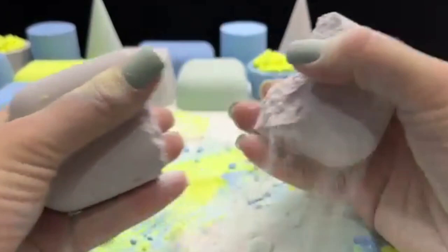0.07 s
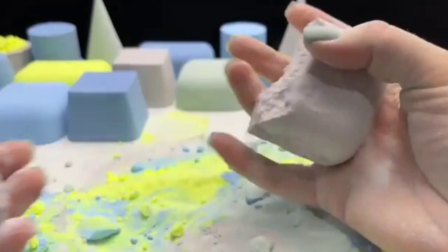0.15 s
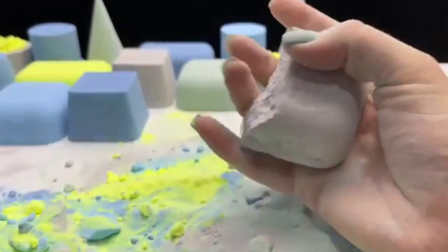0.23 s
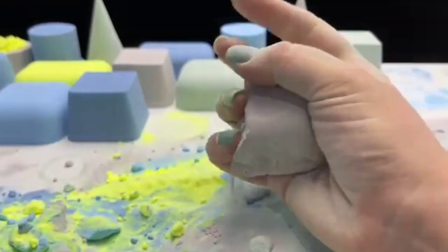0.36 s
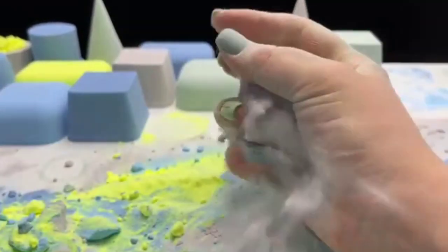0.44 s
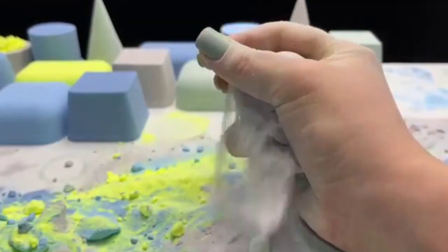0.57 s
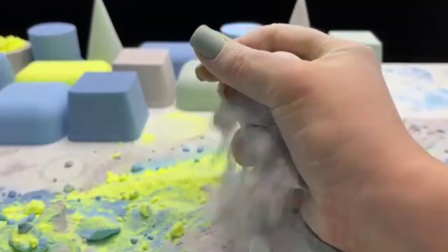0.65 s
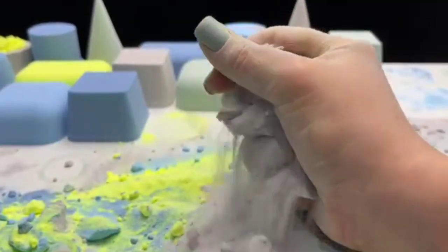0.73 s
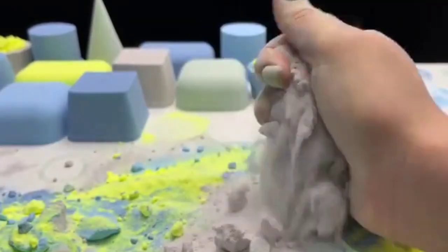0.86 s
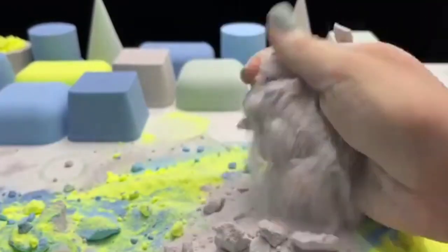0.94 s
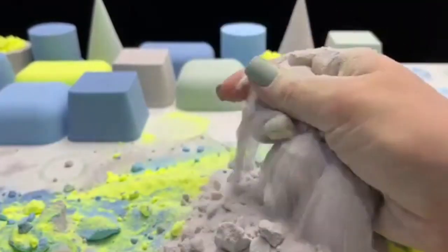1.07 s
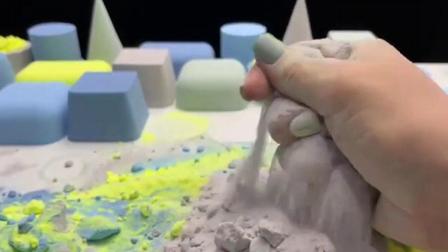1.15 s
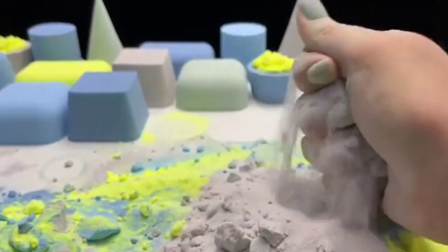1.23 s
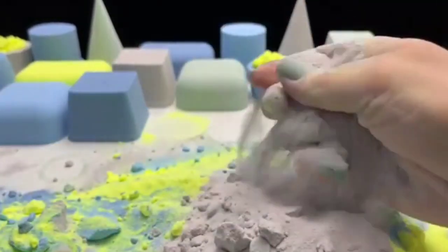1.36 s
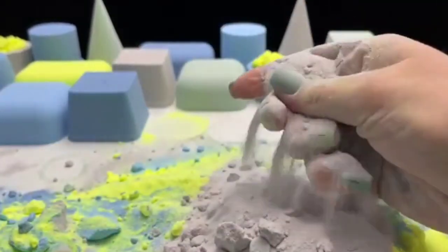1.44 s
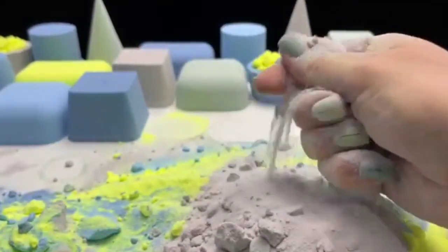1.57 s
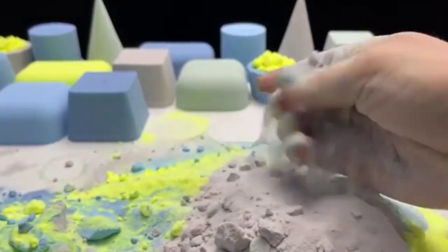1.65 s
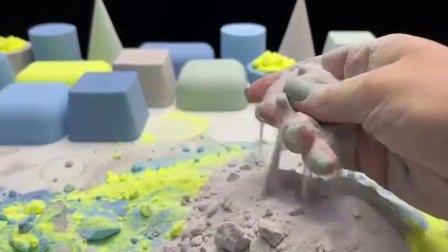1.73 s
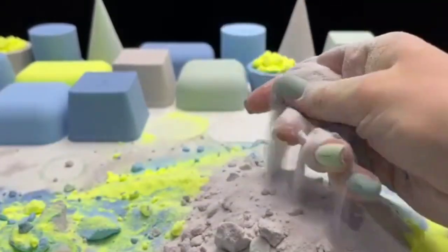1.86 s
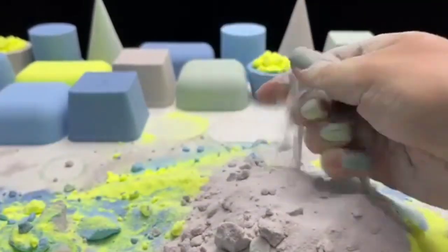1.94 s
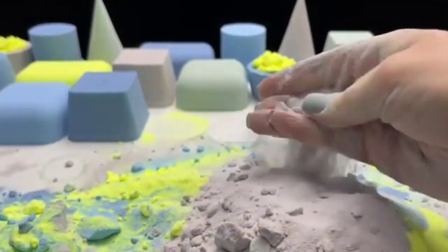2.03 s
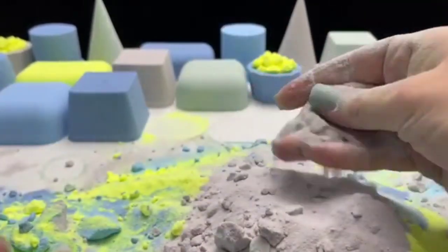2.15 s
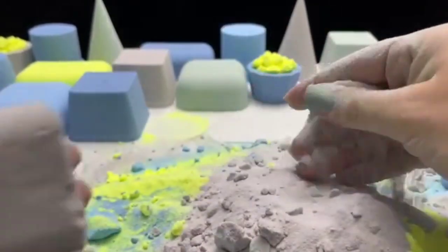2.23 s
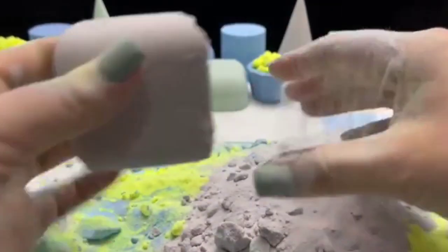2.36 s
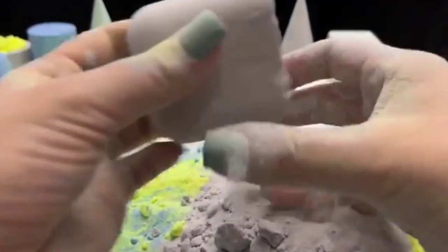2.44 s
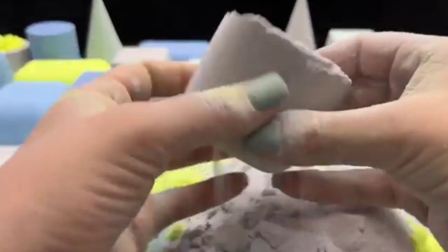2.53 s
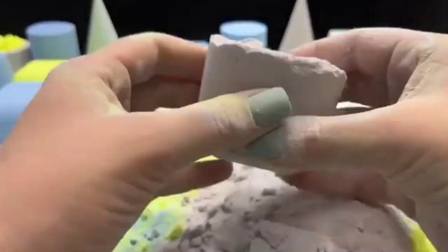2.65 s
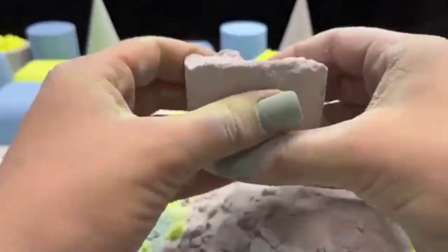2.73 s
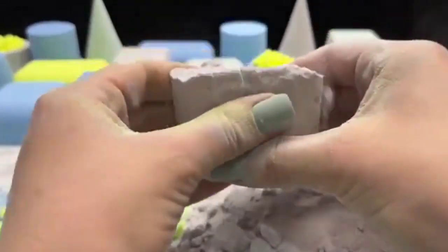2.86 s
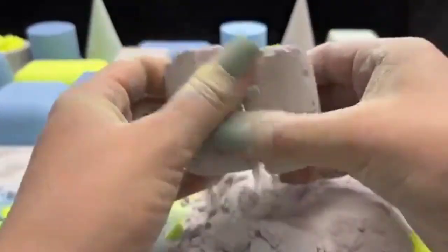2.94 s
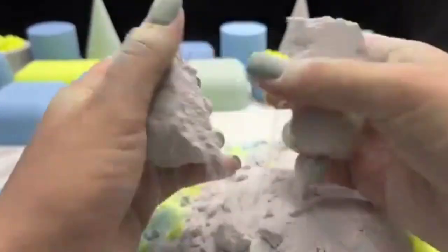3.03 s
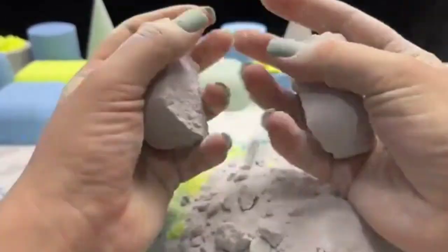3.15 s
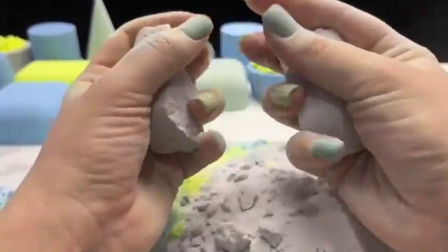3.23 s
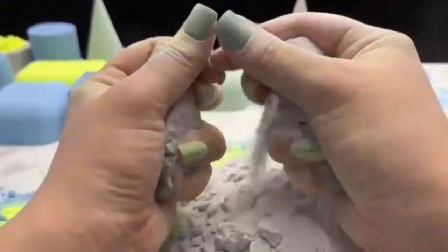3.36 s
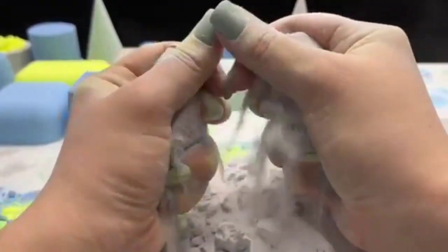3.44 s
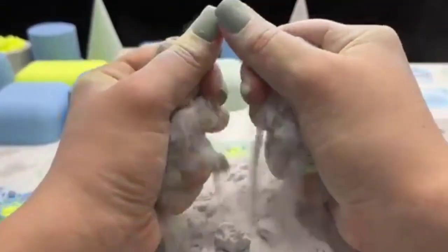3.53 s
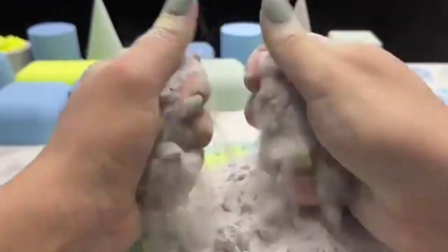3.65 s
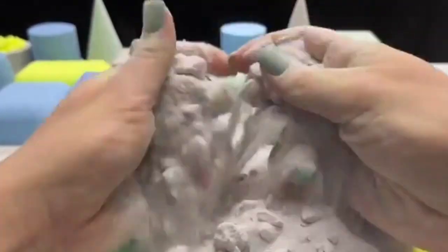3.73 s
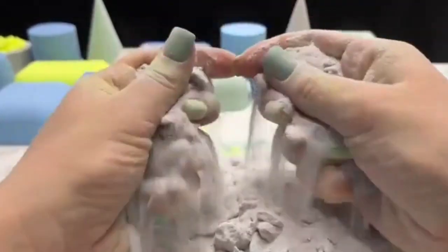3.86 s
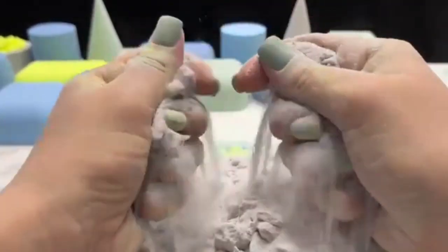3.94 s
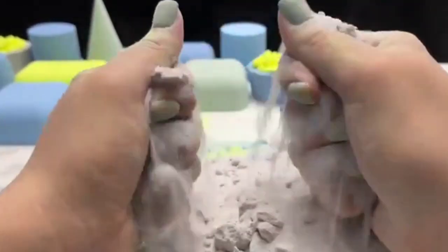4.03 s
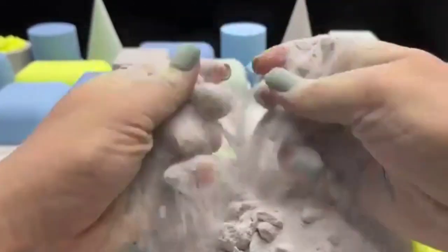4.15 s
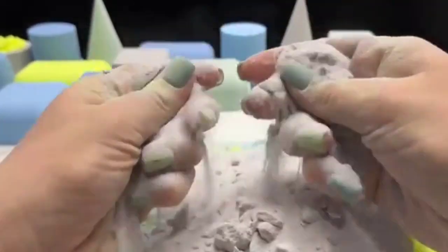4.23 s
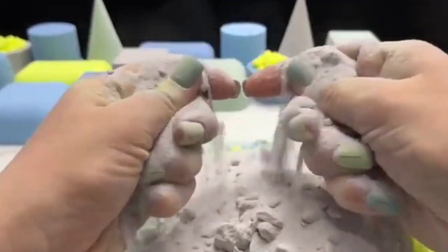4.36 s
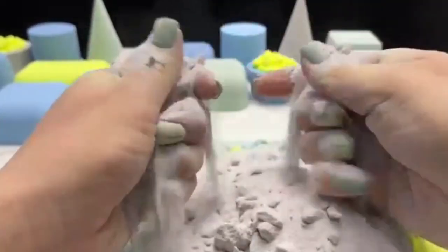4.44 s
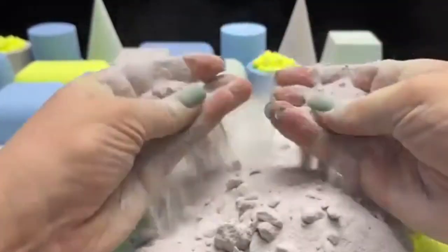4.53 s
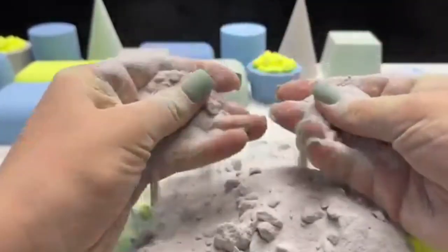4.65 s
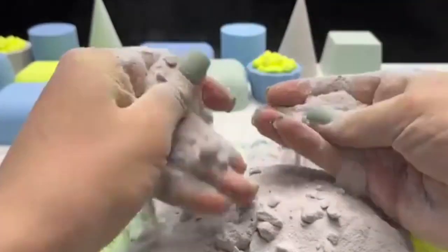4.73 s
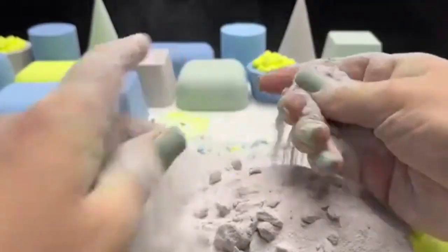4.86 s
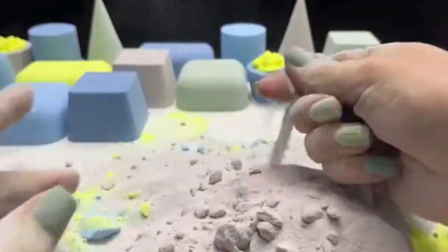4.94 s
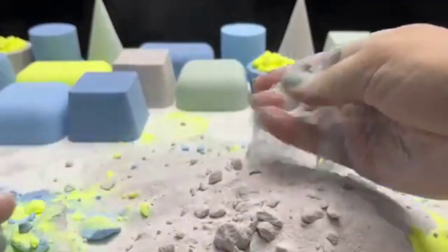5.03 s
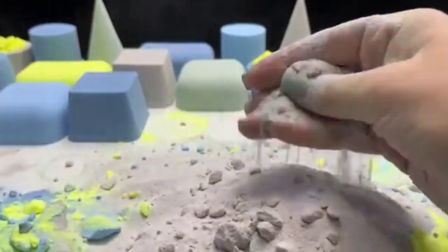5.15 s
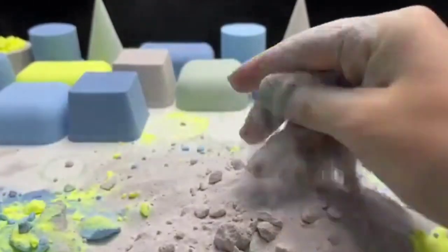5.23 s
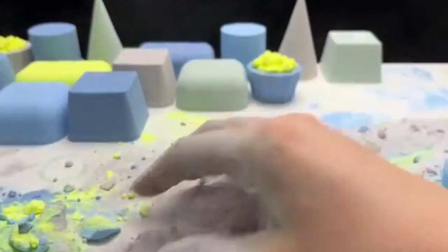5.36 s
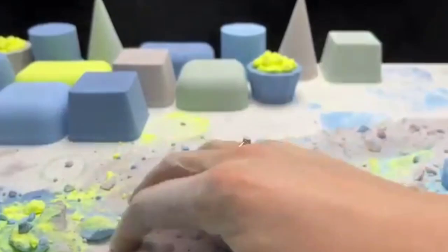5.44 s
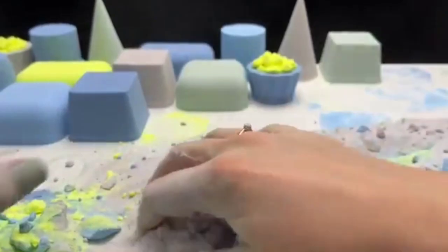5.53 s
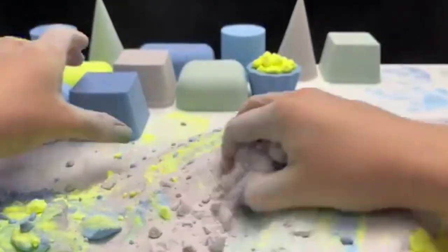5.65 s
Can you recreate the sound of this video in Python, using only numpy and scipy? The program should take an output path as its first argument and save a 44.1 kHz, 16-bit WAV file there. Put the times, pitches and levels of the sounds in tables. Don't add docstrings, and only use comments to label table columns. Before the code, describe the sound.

Two hands break dry pressed powder just above a table. Brief sandy swishes lead to a burst of brittle crunching, low thumps and falling lumps. A quieter stretch of light rubbing ends with a crisp break, then a longer, heavier crunch from both fists. Crumbly taps and thin hiss trail off over faint room noise, close microphones, hardly any echo.

```python
import sys
import numpy as np
from scipy import signal
from scipy.fft import rfft, irfft, next_fast_len
from scipy.io import wavfile
from scipy.ndimage import uniform_filter1d, map_coordinates

SR = 44100
rng = np.random.default_rng(int(sys.argv[2]) if len(sys.argv) > 2 else 0)


def int16_out(signal):
    q = np.round(np.clip(np.atleast_2d(signal).T, -1, 1) * 32767)
    wavfile.write(sys.argv[1], SR, q.astype(np.int16))


def volts_from_db(level):
    exponent = np.asarray(level, float) / 20
    return 10 ** exponent


N = 250929


def unit(x):
    return x / np.sqrt(np.mean(x ** 2) + 1e-20)


def along(points, hz):
    f, v = np.transpose(points)
    return np.interp(np.log(hz + 1), np.log(f + 1), v)


def wobble(rate):
    knots = rng.standard_normal(int(N * 200 / SR) + 4)
    return map_coordinates(knots, [np.arange(N) * min(rate, 200) / SR])


def filtered(x, response):
    m = next_fast_len(N + SR // 2)
    return irfft(rfft(x, m) * response(np.fft.rfftfreq(m, 1 / SR)), m)[..., :N]


# frequency in Hz, lead of the left port in radians.
PORT_LEAD = [(50, 0), (1000, .55), (1700, .1), (3400, .8), (6500, -1.3), (8250, -3.14), (12000, -6.28),
             (15200, -9.42)]


def lead(hz):
    return np.exp(.5j * along(PORT_LEAD, hz) * [[1], [-1]])


# frequency in Hz, left-right likeness from 0 to 1.
PORT_LIKENESS = [(30, 0.96), (300, 0.83), (1400, 0.04), (2200, 1), (3500, 0.3), (5000, 0.49), (6500, 1),
                 (15000, 0.72)]


def ports(pair, spectrum):
    hz = np.fft.rfftfreq(next_fast_len(N + 8192), 1 / SR)
    turn = np.arccos(np.clip(along(PORT_LIKENESS, hz), 0, 1)) / 2
    coloured = rfft(pair, 2 * len(hz) - 2) * volts_from_db(along(spectrum, hz))
    mid, side = coloured * [np.cos(turn), np.sin(turn)]
    return unit(irfft(np.array([mid + side, mid - side]) * lead(hz))[:, :N])


def grains(per_s, spread_db, bed):
    draw, size = rng.random((2, N)), rng.exponential(1, (2, N))
    loudness = volts_from_db(spread_db * np.minimum(size, 4))
    hits = (draw < per_s / SR) * loudness * rng.standard_normal((2, N))
    return unit(hits) + bed * rng.standard_normal((2, N))


def strokes(rows, levels_db, slopes):
    t = np.arange(0, N + 64, 64) / SR
    start, length = rows[:, :1], rows[:, 1:2]
    rise_db = -slopes[0] * np.maximum(start - t, 0)
    fall_db = -slopes[1] * np.maximum(t - start - length, 0)
    power = np.sum(volts_from_db(levels_db[:, None] + rise_db + fall_db) ** 2, axis=0)
    return np.interp(np.arange(N) / SR, t, np.sqrt(power))


# frequency in Hz, width in Hz, level in dB.
TABLE_MODES = [(254.4, 21.4, -3), (349, 190, -21), (475, 70, -35), (695, 26, -3.5)]


def table_wave(hz, cycles=1.18):
    spread = np.exp(-2j * np.pi * cycles * np.log(np.clip(hz, 150, 3000) / 3000))
    modes = sum(volts_from_db(db) * 1j * hz * w / (c * c - hz * hz + 1j * hz * w) for c, w, db in TABLE_MODES)
    return spread * (1 + modes)


# frequency in Hz, 60 dB decay time in seconds.
ROOM_DECAY = [(150, 0.24), (400, 0.24), (700, 0.097), (2000, 0.22), (8000, 0.066)]


def room(x):
    hz, t, z = signal.stft(rng.standard_normal((2, SR // 3)), SR, nperseg=256)
    decay = volts_from_db(-60 * t / along(ROOM_DECAY, hz)[:, None])
    common, own = signal.istft(z * decay, SR, nperseg=256)[1]
    tails = np.array([common + 0.44 * own, common - 0.53 * own]) / np.linalg.norm(common)
    late = np.pad(x, (200, 0))[None]
    return signal.fftconvolve(late, tails, axes=1)[:, :N]


# frequency in Hz, density in dB per Hz.
AIR_SPECTRUM = [(300, -13), (1200, -8), (3000, -2), (7000, 0), (12000, 1), (15000, -2)]


def floor():
    return volts_from_db(-62.5) * ports(rng.standard_normal((2, N)), AIR_SPECTRUM)


def patches(pair, width_hz, length_s, depth_db):
    z = signal.stft(pair, nperseg=512)[2]
    bins, frames = max(1, round(width_hz * 512 / SR)), max(1, round(length_s * SR / 256))
    field = uniform_filter1d(rng.standard_normal(z.shape[1:]), bins, axis=0)
    field = uniform_filter1d(field, frames, axis=1)
    return signal.istft(z * volts_from_db(depth_db * unit(field)), nperseg=512)[1][:, :N]


def slips(per_s, fade_s, depth):
    jumps = (rng.random(N) < per_s / SR) * rng.uniform(.2, 1.4, N)
    onsets = uniform_filter1d(jumps, size=60) * 60
    return unit(1 + depth * signal.lfilter([1], [1, -np.exp(-1 / (fade_s * SR))], onsets))


# start in seconds, end in seconds.
HISS_DIPS = [
    (2.33, 2.39),
    (5.315, 5.44),
]


def hush():
    t = np.arange(N) / SR
    dipped = sum(1. * (t > a) * (t < b) for a, b in HISS_DIPS)
    return volts_from_db(-9 * uniform_filter1d(dipped, size=300))


# start in seconds, length in seconds, hiss in dB, coarseness in dB.
FINGER_RUBS = [(0.0, 0.0097, -43, -3.6), (0.081, 0.033, -37, -8), (0.153, 0.066, -37.5, -12),
               (0.279, 0.19, -37, -12), (1.177, 0.089, -42, -4), (1.485, 0.15, -45, -1.5),
               (1.66, 0.29, -56.5, 1), (1.837, 0.14, -47, -2.5), (2.032, 0.25, -50, -3.5),
               (2.253, 0.067, -45, -5), (2.368, 0.037, -50, -10.5), (2.478, 0.11, -40, -7),
               (2.671, 0.1, -44.5, -5.5), (2.784, 0.034, -56, -8), (2.875, 0.0067, -41, -23),
               (2.961, 0.013, -38, -8), (2.995, 0.026, -55.5, -6), (3.049, 0.089, -41, -8),
               (3.165, 0.051, -50, -10), (3.235, 0.1, -38.5, -8.5), (4.542, 0.16, -49, 1),
               (4.737, 0.07, -42, -1), (4.858, 0.14, -46, -13), (5.026, 0.069, -56, -7),
               (5.131, 0.15, -50, 0.3), (5.253, 0.055, -46, -4), (5.324, 0.12, -64, 3.5)]
# start in seconds, length in seconds, hiss in dB, coarseness in dB,
# crushing force in dB.
FIST_SQUEEZES = [(0.466, 0.35, -40.5, 0.45, -43.5), (0.845, 0.13, -49, 2, -53),
                 (1.055, 0.092, -43, 0.7, -45), (1.292, 0.16, -51.5, 1, -78), (1.419, 0.12, -56, -9, -50),
                 (3.343, 0.17, -37, 1.4, -40.5), (3.539, 0.12, -42, 3.2, -42.5), (3.811, 0.21, -37, 1, -40),
                 (4.112, 0.1, -46.5, 2.2, -51.5), (4.25, 0.17, -40.5, -0.55, -51),
                 (4.59, 0.068, -69, 0.5, -48.5), (4.854, .085, -55.5, 7.5, -64),
                 (5.481, .27, -50.5, 6, -50.5)]
RUB_SLOPES, SQUEEZE_SLOPES = (415, 630), (290, 117)  # (rise, fall) in dB per s


def flow(coarse_share, offset_db):
    gains = []
    for table, slopes in [(FINGER_RUBS, RUB_SLOPES), (FIST_SQUEEZES, SQUEEZE_SLOPES)]:
        rows = np.array(table)
        gains.append(strokes(rows, offset_db + rows[:, 2] + coarse_share * rows[:, 3], slopes))
    return gains


# frequency in Hz, density in dB per Hz.
FINE_SPECTRUM = [(1200, -54), (5000, -7), (7000, 5.5), (8500, 4.5), (11500, 6), (14000, 4), (15100, 1),
                 (15300, -77)]
COARSE_SPECTRUM = [(900, -42), (1800, -20), (2900, -3), (3600, 3.5), (5000, 2), (6500, -1), (8000, -5.5),
                   (11000, -10.5)]
SCRAPE_SPECTRUM = [(1100, -9), (1700, -8.5), (2050, -4.5), (2800, -7), (3300, -10.5), (5000, -65)]


def powder():
    surge = slips(per_s=34, fade_s=0.0065, depth=0.011) * volts_from_db(0.95 * wobble(28)) * hush()
    rub, squeeze = flow(0.98, 0)
    rub_share = rub / (rub + squeeze)
    hollow_db = 2.1 * np.pad(rub_share, (0, 512), 'edge')[::256][:N // 256 + 2]
    fine = patches(grains(per_s=6600, spread_db=1.0, bed=2.3), width_hz=500, length_s=0.071, depth_db=3.0)
    coarse = patches(grains(per_s=3000, spread_db=2.0, bed=3.0),
                     width_hz=180, length_s=0.097, depth_db=2 + hollow_db)
    scrape = patches(grains(per_s=2400, spread_db=5.5, bed=1.9), width_hz=400, length_s=0.06, depth_db=3.5)
    hiss = np.hypot(*flow(0, 0)) * ports(fine, FINE_SPECTRUM)
    rasp = np.hypot(rub, squeeze) * ports(coarse, COARSE_SPECTRUM)
    scraping = np.hypot(*flow(1.6, -3)) * ports(scrape, SCRAPE_SPECTRUM)
    left_nearer = volts_from_db(np.array([[.8], [-.8]]))
    return volts_from_db(2.5) * surge * (hiss + left_nearer * (rasp + scraping))


# frequency in Hz, density in dB per Hz.
LUMP_SPECTRUM = [(70, -78), (150, 0.5), (250, 5), (450, 1), (750, -4), (1000, -24.5), (1600, -45)]
GRIT_SPECTRUM = [(500, -4), (850, 9.5), (1100, 1), (1500, 7), (1900, -52), (3000, -39)]
THUMP_SPECTRUM = [(18, -66), (32, -13), (55, 1), (80, 2.5), (110, -7), (150, -9), (230, -38)]
# start in seconds, length in seconds, thump in dB.
TABLE_JOLTS = [(0.234, 0.06, -49), (0.452, .03, -42), (0.573, 0.027, -30.5), (1.46, 0.023, -45),
               (1.82, 0.016, -40), (2.874, 0.019, -37), (3.608, 0.041, -29), (3.896, 0.063, -34),
               (4.268, 0.048, -35.5), (4.908, 0.026, -47), (5.096, 0.11, -48)]
JOLT_SLOPES = (1600, 230)  # (rise, fall) in dB per s
RESTING_DB = -69, -80, -53


def crumbs():
    rows = np.array(FIST_SQUEEZES)
    force = strokes(rows, rows[:, 4], SQUEEZE_SLOPES)
    grit_db = -3.5 + rows[:, 4] + 0.62 * rows[:, 3]
    drive = [force, strokes(rows, grit_db, SQUEEZE_SLOPES), force * volts_from_db(2)]
    crumble, gritty, heavy = np.hypot(drive, volts_from_db(np.array(RESTING_DB))[:, None])
    jolts = np.array(TABLE_JOLTS)
    heavy = np.hypot(heavy, strokes(jolts, jolts[:, 2], JOLT_SLOPES))
    surge = wobble(30)
    lumps = filtered(ports(grains(per_s=450, spread_db=2.5, bed=0.85), LUMP_SPECTRUM), table_wave)
    grit = ports(grains(per_s=900, spread_db=-2.0, bed=1.0), GRIT_SPECTRUM)
    thump = ports(rng.standard_normal((2, N)), THUMP_SPECTRUM)
    crumbling = crumble * volts_from_db(2.0 + 0.76 * surge) * unit(lumps)
    return crumbling + gritty * volts_from_db(3.5 + 1.35 * surge) * grit + heavy * thump


def splinter_noise(count):
    return rng.standard_normal(count) + .5 * rng.standard_normal((2, count))


# frequency in Hz, density in dB per Hz.
THUD_SPECTRUM = [(60, -20), (120, -4.5), (250, 1), (420, -1.5), (620, -10.5), (1100, -44.5)]
KNOCK_SPECTRUM = [(250, -35), (450, -7), (650, 2), (1000, -2.5), (1350, -8), (2400, -37)]
BRIGHT_SPECTRUM = [(700, -30), (1250, -8.5), (1900, 7.5), (2600, -0.5), (3800, -9), (9000, -43)]
# time in seconds, knock in dB, weight in dB over the knock, crispness in dB over the knock.
FIST_FRACTURES = [(0.4473, -17, -1.5, 0.5), (0.509, -40, -12, -17), (0.537, -22.5, -5.5, -10),
                  (0.5429, -18, -6.5, -5), (0.577, -26.5, 5, 0), (0.5861, -20, 0.5, 1.2),
                  (0.5997, -19, -1, -13), (0.6061, -11.5, -7.5, -15), (0.616, -21, 3.5, -1.5),
                  (0.6469, -21, -1, -4), (0.664, -23, 2.5, 0.5), (0.7074, -15.5, -4.5, -3),
                  (0.7337, -32, 5, 0), (0.769, -12.5, -6, -12), (0.7756, -11, -6, -13),
                  (0.824, -37.5, -10, 9.5), (0.83, -17.5, -3.5, -12), (0.8954, -38.5, 5, -12),
                  (1.0902, -30, -7, -1), (1.1354, -33, 11.5, -8), (1.111, -40.5, 13.5, -6),
                  (1.1551, -35, 6, -2),
                  (2.8615, -11.5, 5, -8.5), (3.3106, -25.5, -16, -2.5), (3.351, -25.5, -3, -23),
                      (3.3943, -18, 4, -28), (3.4154, -23, -3, -27), (3.4233, -7, -11, -12),
                      (3.4296, -16, -6, -9), (3.4595, -14.5, -4, -5), (3.4874, -21.5, -1, -1),
                      (3.5082, -18.5, 2.5, -7), (3.5221, -15, -14, -13), (3.5266, -23, -1, -4),
                      (3.5638, -17.5, -6, -10), (3.5993, -16, -4, -10), (3.631, -22.5, 0.5, 6.5),
                      (3.6454, -22.5, -10, -16), (3.7981, -18.5, -19, 1), (3.814, -26, 2.5, -22),
                      (3.8603, -20, 5.5, -3), (3.8871, -17.5, -6, -17), (3.931, -24, 7, -25),
                      (3.9427, -20, 1, 2), (3.96, -21, -2, 2), (3.9675, -15, -12, -31),
                      (4.0208, -32, 3, -36), (4.0418, -25, -15, -36), (4.0503, -40.5, 10.5, -3),
                      (4.279, -30.5, 2, 8)]
LUMP_FALLS = [(0.417, -36.5, -10, -2), (1.2671, -34, -1, -8), (1.446, -42.5, 12.5, -4),
              (1.4651, -20.5, -0.5, -7), (1.749, -37.5, 1, 1.5), (1.8185, -24.5, -5.5, 12),
              (1.824, -17.5, -4, 5.5), (1.839, -31, -11, -7), (2.1709, -21, -4, 0), (2.1756, -54, -8, -7),
              (4.2095, -28, -1, -13), (4.2355, -14.5, -3, -7), (4.2554, -13.5, 1.5, -3),
              (4.2606, -25.5, -1, 6), (4.308, -37, 9.5, -3), (4.6246, -45, 18, -10),
              (4.648, -35.5, 10.5, -9), (4.6555, -31, -7, -15), (4.6713, -30, -7, -4),
              (4.8896, -25, -4.5, -4), (4.911, -38.5, 3.5, -2), (2.571, -60, 13, 1.5), (5.192, -39, -13, 2),
              (1.957, -52, -11, 19.5)]
FRACTURE_SNAP_DB, FALL_SNAP_DB = 0.1, -11
LEFT_DB, WANDER_DB = 1, 1.8


def cracks():
    blows, snap = np.zeros((3, 2, N + SR)), np.zeros((2, N + SR))
    t = np.arange(SR // 20) / SR
    events = [(*row, FRACTURE_SNAP_DB) for row in FIST_FRACTURES]
    events += [(*row, FALL_SNAP_DB) for row in LUMP_FALLS]
    for s, knock_db, weight_db, crisp_db, air_db in events:
        at = round(s * SR)
        blow_db = knock_db + np.array([weight_db, 0, crisp_db])
        snap_db = knock_db + crisp_db + air_db
        sides = volts_from_db(np.array([[.5], [-.5]]) * (LEFT_DB + WANDER_DB * rng.standard_normal()))
        splinters = volts_from_db(-26 - 60 * t / 0.048) * splinter_noise(len(t))
        splinters[:, 0] = 1
        far = rng.integers(2)
        splinters[far] = np.roll(splinters[far], rng.integers(0, 6))
        blows[..., at:at + len(t)] += volts_from_db(blow_db)[:, None, None] * sides * splinters
        snap[:, at:at + len(t)] += volts_from_db(snap_db - 60 * t / 0.038) * splinter_noise(len(t))

    def through_table(blow, points):
        return filtered(blow, lambda hz: volts_from_db(along(points, hz)) * table_wave(hz) * lead(hz))

    def through_air(hz):
        return volts_from_db(along([(1500, -13), (3000, 0.0), (8000, -4), (15000, -5)], hz)) * lead(hz)

    thud, knock, bright = blows[..., :N]
    knocks = volts_from_db(33.5) * through_table(thud, THUD_SPECTRUM)
    knocks += volts_from_db(27.5) * through_table(knock, KNOCK_SPECTRUM)
    knocks += volts_from_db(19.0) * through_table(bright, BRIGHT_SPECTRUM)
    air = volts_from_db(-1) * filtered(snap[:, :N], through_air)
    return knocks + air + volts_from_db(-12) * room(knocks.mean(0))


def scene():
    return floor() + powder() + crumbs() + cracks()


def low_pass(x):
    return signal.sosfilt(signal.butter(12, 15820, fs=SR, output="sos"), x)


# lower edge in Hz, upper edge in Hz.
SUM_LOST = [(7650, 8900), (14650, 23000)]
DIFFERENCE_LOST = [(11150, 13000), (15150, 23000)]
# start in seconds, end in seconds.
PORTS_APART = [
    (.435, .46),
    (.525, .61),
    (1.43, 1.46),
    (1.81, 1.835),
    (2.855, 2.868),
    (3.19, 3.215),
    (5.305, 5.325),
]


def record(dry):
    def kept(bands, hz):
        return 1 - sum((hz > lo) & (hz < hi) for lo, hi in bands)

    both = np.array([dry[0] + dry[1], dry[0] - dry[1]]) / 2
    mid, side = filtered(both, lambda hz: np.array([kept(SUM_LOST, hz), kept(DIFFERENCE_LOST, hz)]))
    joined = np.array([mid + side, mid - side])
    separate = filtered(dry, lambda hz: hz < 15400)
    t = np.arange(N) / SR
    apart = uniform_filter1d(sum(1. * (t > a) * (t < b) for a, b in PORTS_APART), 300)
    return low_pass(apart * separate + (1 - apart) * joined)


dry = scene()
out = record(dry)
int16_out(out)
```